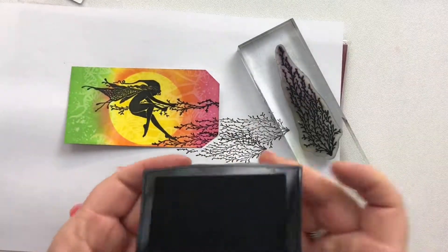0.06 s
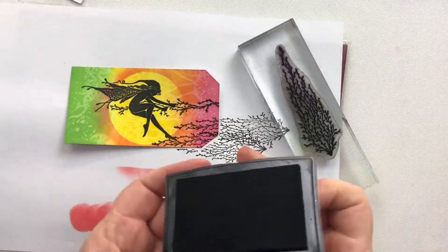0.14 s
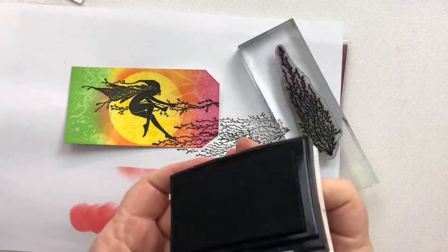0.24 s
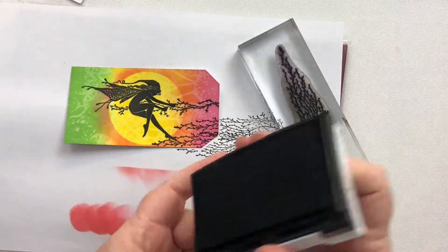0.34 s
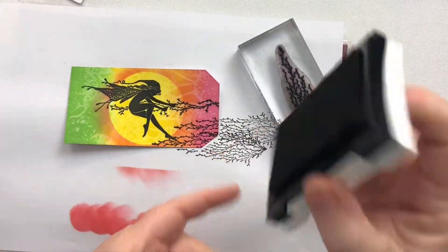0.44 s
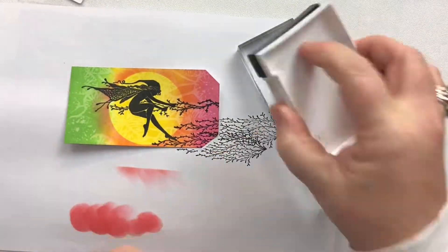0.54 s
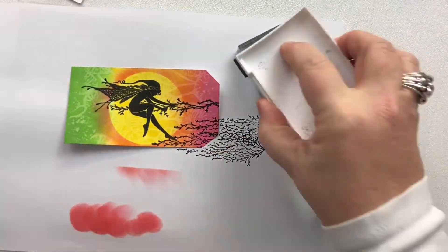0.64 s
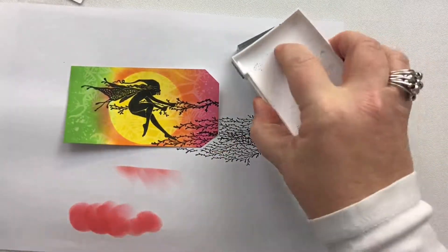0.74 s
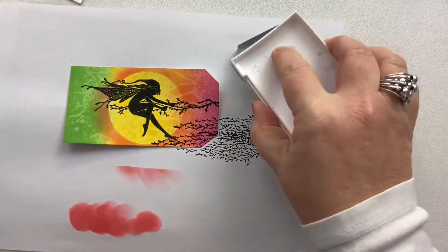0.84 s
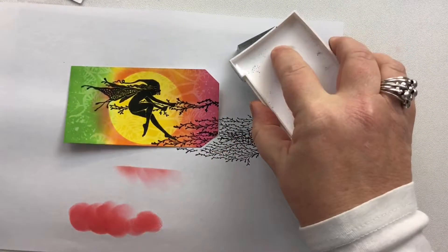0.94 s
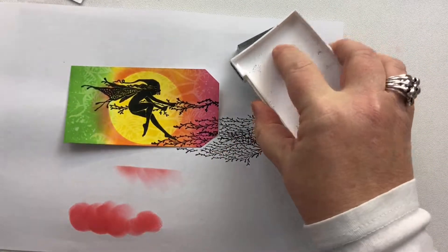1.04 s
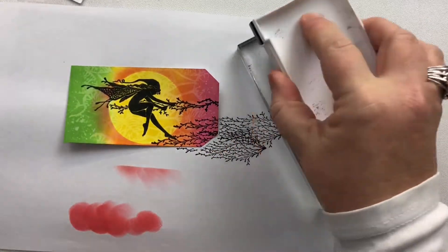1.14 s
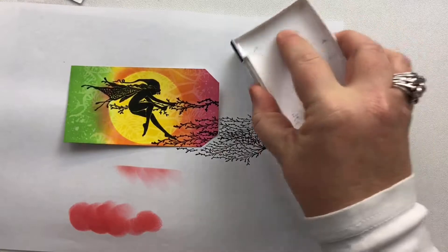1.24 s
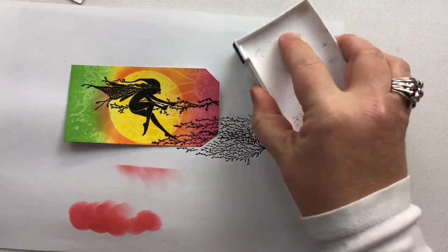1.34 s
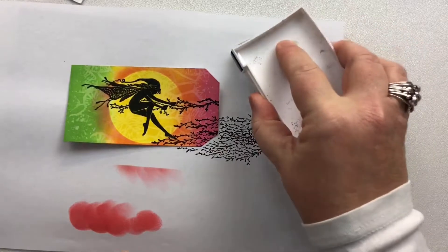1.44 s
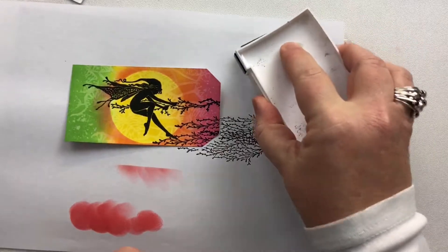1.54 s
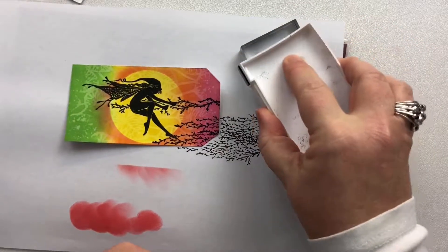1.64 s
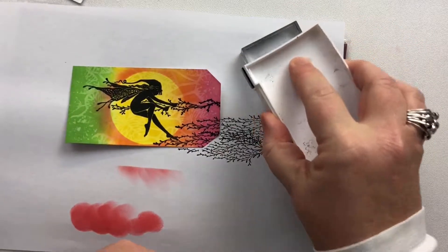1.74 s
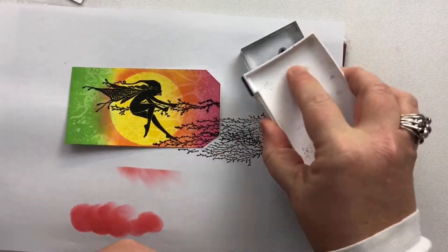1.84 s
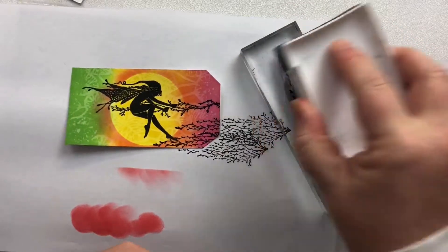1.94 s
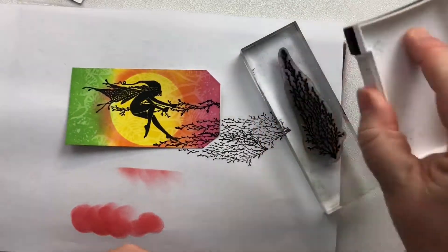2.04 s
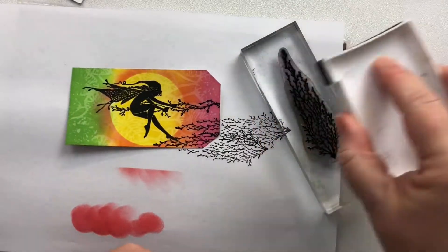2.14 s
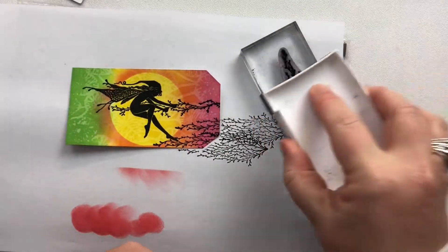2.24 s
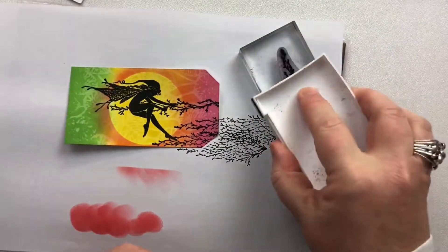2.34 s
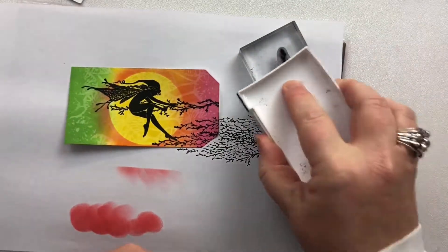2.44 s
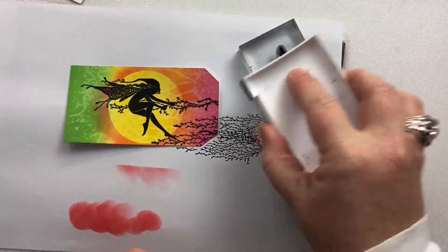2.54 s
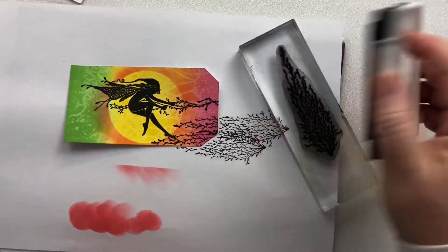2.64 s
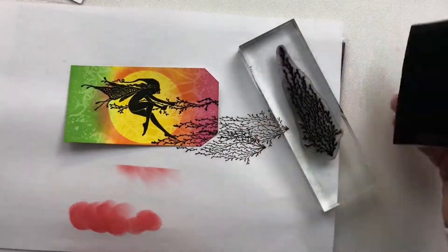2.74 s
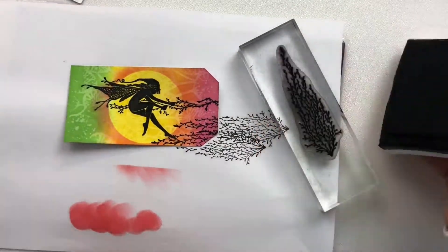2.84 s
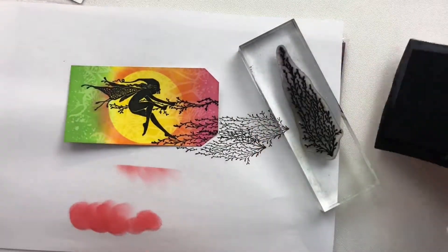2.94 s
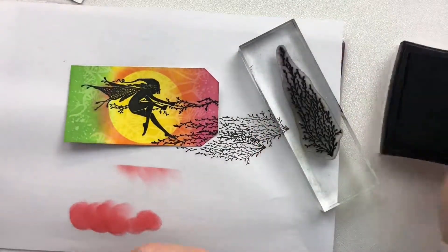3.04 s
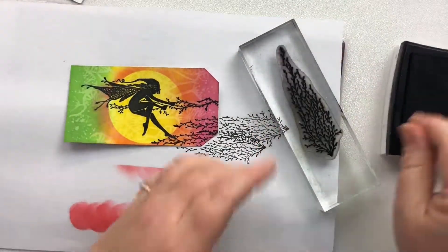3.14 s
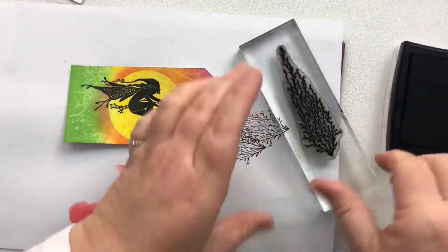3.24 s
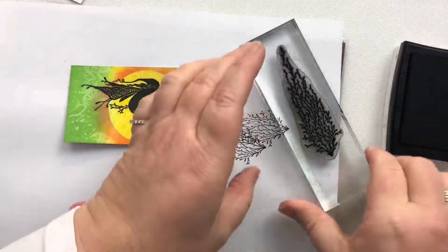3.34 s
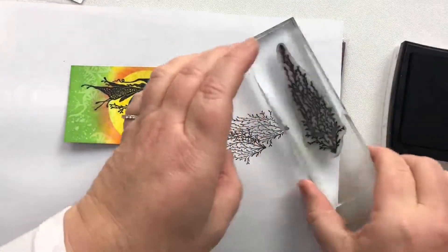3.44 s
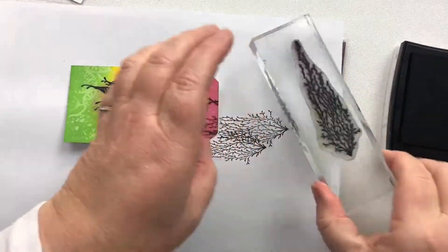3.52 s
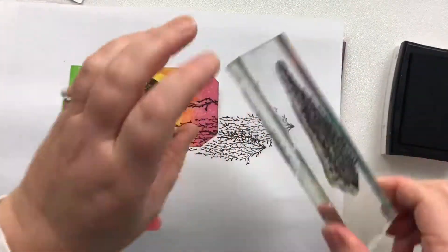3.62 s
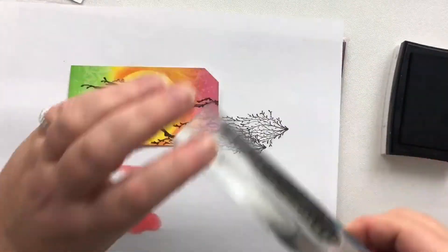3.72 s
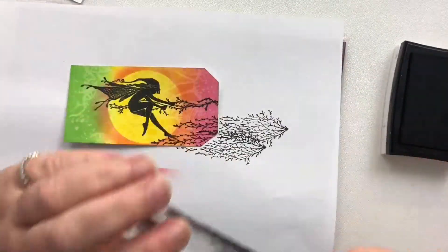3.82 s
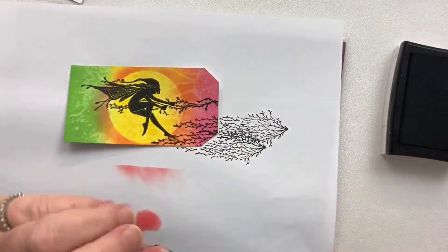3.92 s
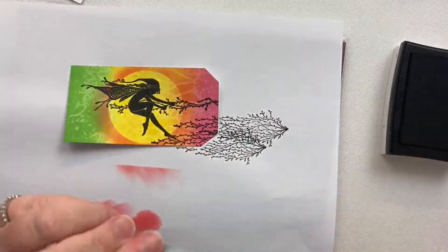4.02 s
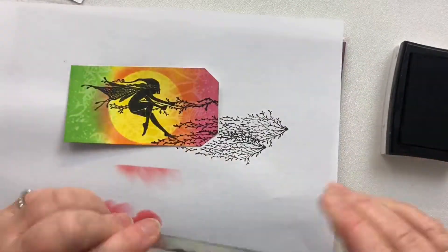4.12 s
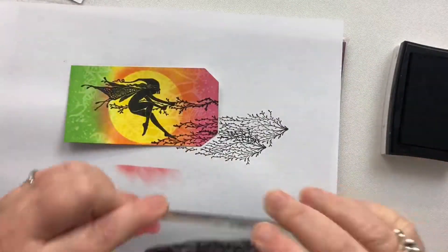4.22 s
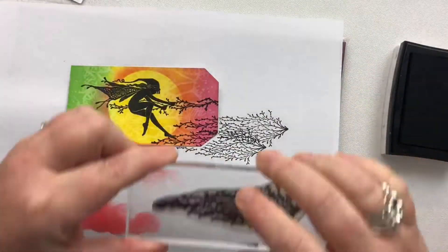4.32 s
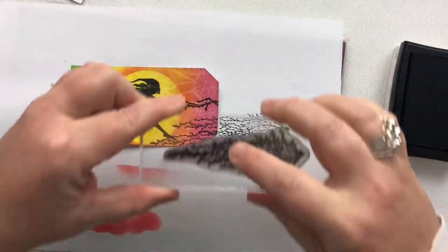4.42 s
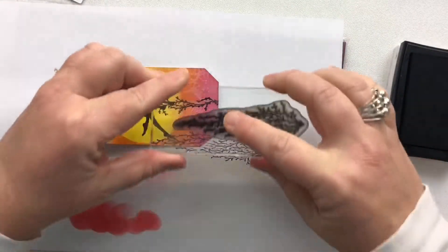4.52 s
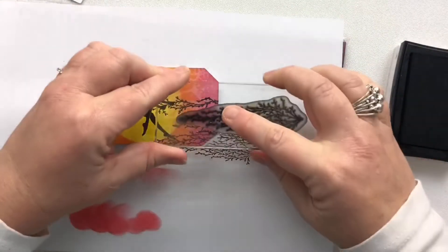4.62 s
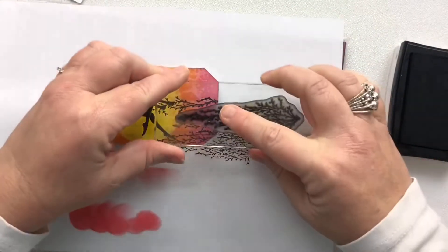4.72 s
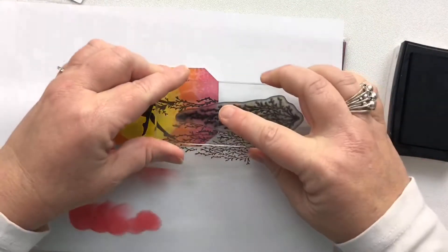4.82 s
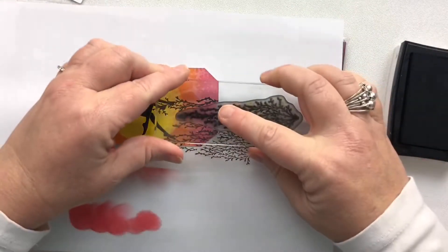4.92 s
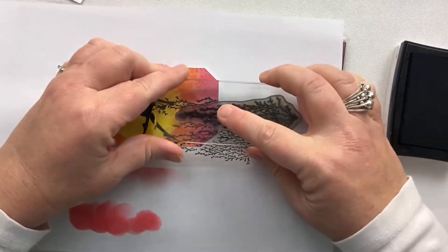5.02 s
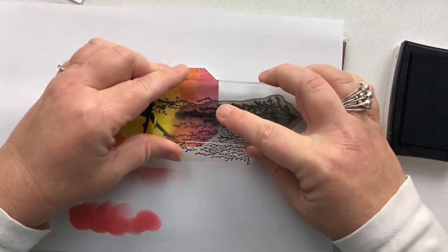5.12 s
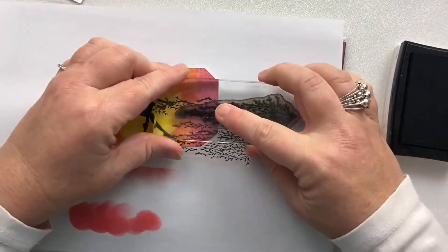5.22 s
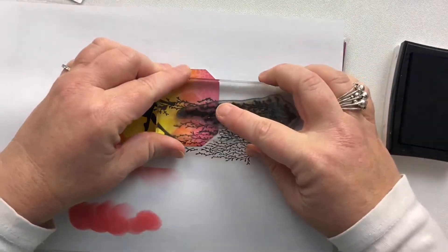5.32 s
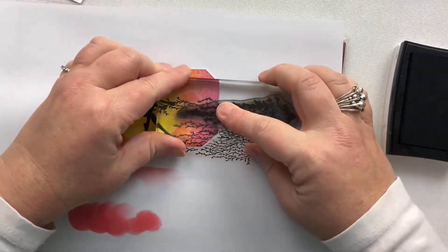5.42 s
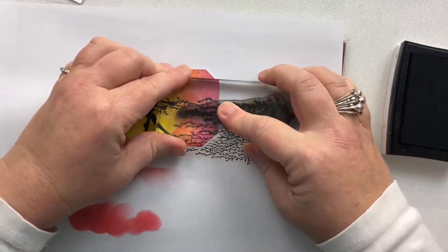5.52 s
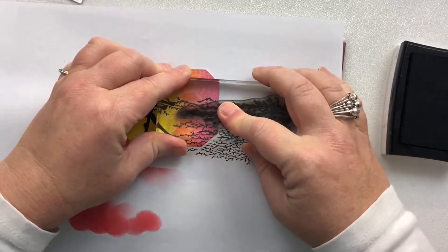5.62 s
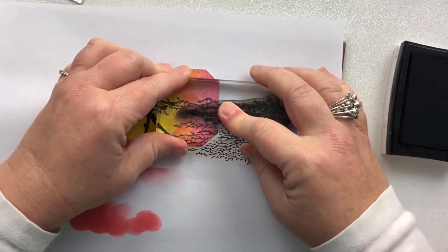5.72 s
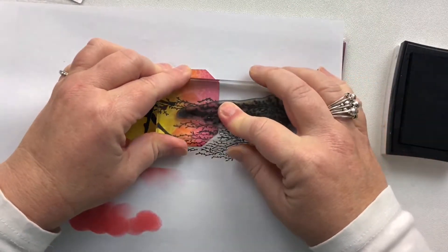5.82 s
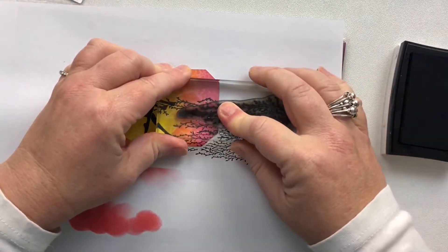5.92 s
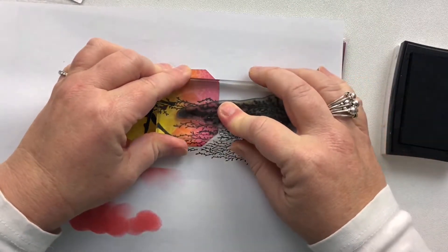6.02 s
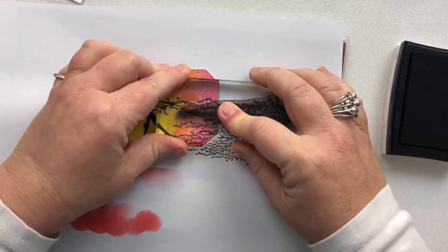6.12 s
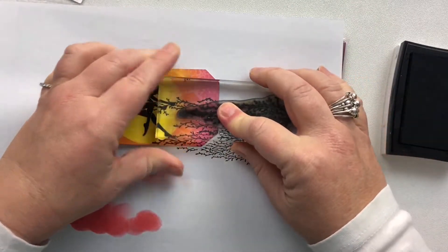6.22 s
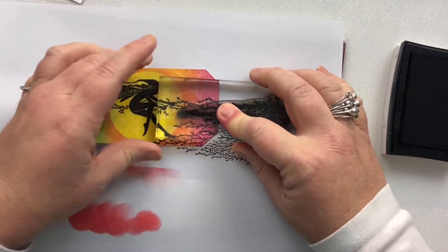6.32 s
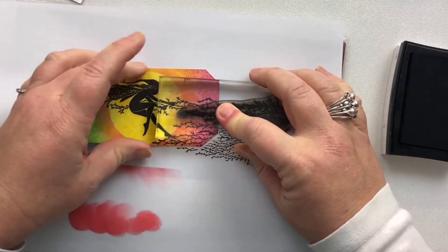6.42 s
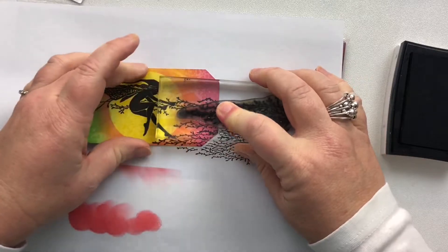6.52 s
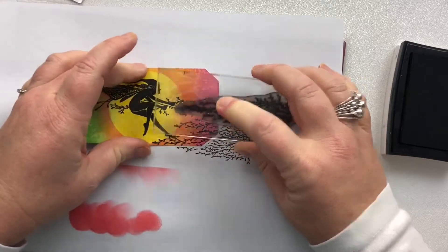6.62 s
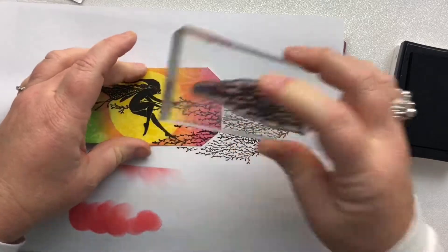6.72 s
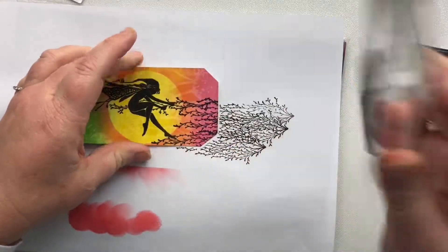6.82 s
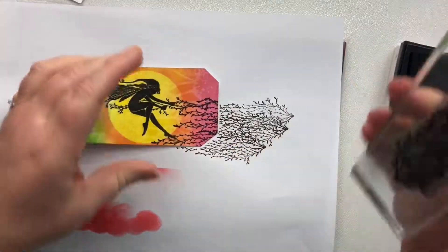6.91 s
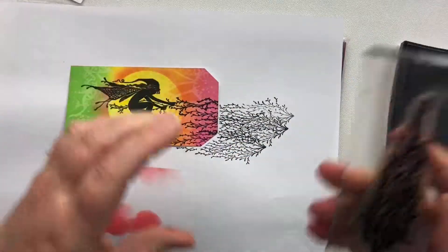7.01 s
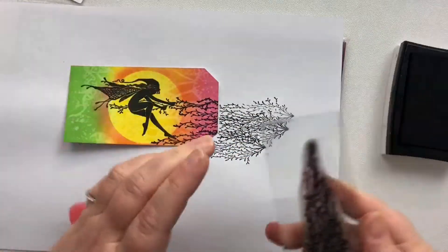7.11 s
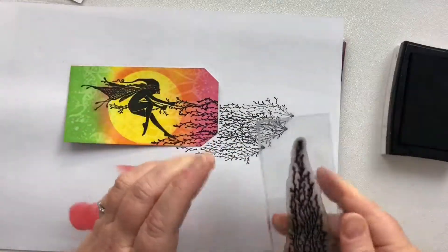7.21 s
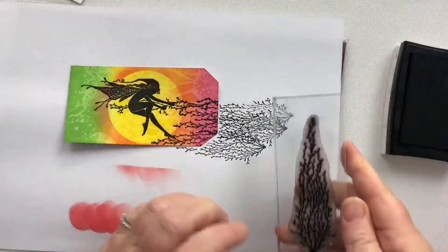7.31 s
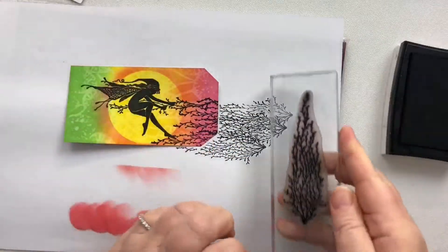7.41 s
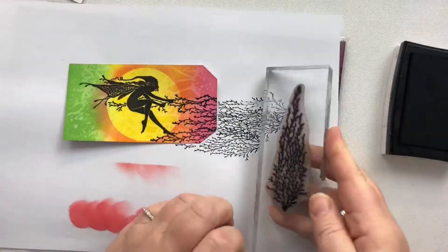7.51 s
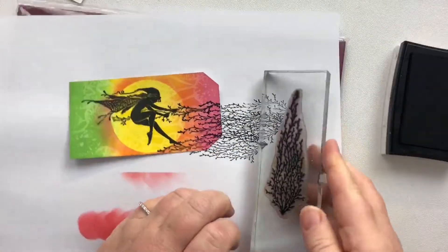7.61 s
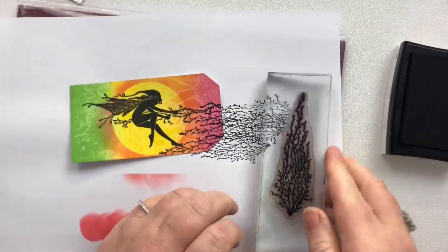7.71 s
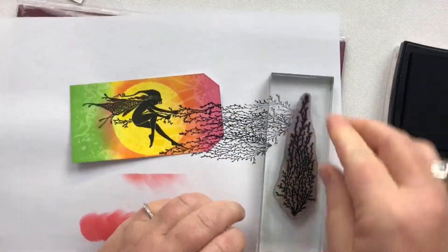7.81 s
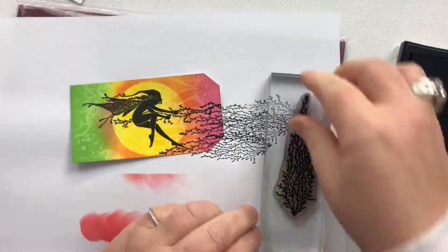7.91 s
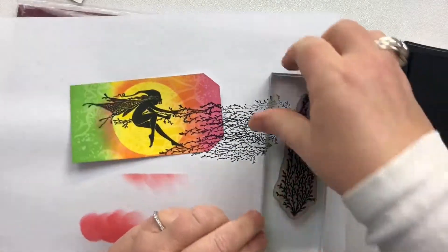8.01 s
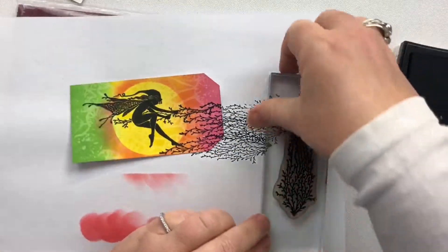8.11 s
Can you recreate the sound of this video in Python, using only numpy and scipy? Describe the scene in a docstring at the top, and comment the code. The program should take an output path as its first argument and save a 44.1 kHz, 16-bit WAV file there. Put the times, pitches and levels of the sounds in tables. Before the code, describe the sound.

Soft ink pad dabs knock on a block, a plastic case drops and clatters on a wooden desk, then quiet rustling and faint sticky ticks.

```python
"""Ink pad and stamp on a desk

An ink pad is dabbed on a stamp block lying on a wooden desk, then dropped aside, where its plastic case
bounces; the block is lifted, pressed on paper, peeled off and set down. Blows drive resonant bodies with
chatter and dying noise; fingers tick through sharp resonances, sleeves rustle as band-limited noise. A small
quiet room adds mains hum and echoes; the microphone stands on the desk and feels its low modes thump."""
import sys
import numpy as np
from scipy import signal
from scipy.fft import rfft, irfft
from scipy.io import wavfile

SR = 44100
rng = np.random.default_rng(int(sys.argv[2]) if len(sys.argv) > 2 else 0)


def wrap_up_sound(samples):
    """Save the sound to the file named by the first command line argument, as 16-bit audio."""
    columns = np.atleast_2d(samples).T
    # keep every value between -1 and 1, then stretch to whole-number steps
    tamed = np.clip(columns, -1, 1)
    steps = np.round(tamed * 32767).astype(np.int16)
    wavfile.write(sys.argv[1], SR, steps)


N = 359856   # samples

# Soft blows through the pad or the block into the desk. Each row: start in seconds, knock, middle and crack
# levels in dB, ringing share in dB, struck spot in Hz, desk shake in dB. Body levels are added to the first three.
DAB_BLOWS = [(0.3659, -54.5, -77, -49, -10, 545, -70), (0.6717, -33.5, -50, -42, -7.5, 580, -40),
             (0.7087, -36.5, -25.5, -13.5, -8, 1860, -30), (0.7792, -50, -66, -45, -7, 1540, -53),
             (1.3305, -39.5, -42.5, -27, -2.5, 590, -29.5), (1.3333, -42, -53, -31.5, -12, 6600, -60),
             (1.4987, -27, -36, -34.5, -6, 627, -21), (1.6832, -30, -32, -26.5, -13.5, 590, -23),
             (1.8574, -29.5, -27.5, -32.5, -4, 637, -23.5), (2.3368, -32.5, -39, -29.5, -9.5, 520, -31.5),
             (2.5145, -56, -40.5, -43.5, -3.5, 493, -28.5), (3.3512, -55, -58, -44, -14, 703, -44.5),
             (5.3404, -60.5, -65, -57.5, 1, 564, -44.5), (6.244, -62.5, -75.5, -60, -8, 503, -47),
             (6.4551, -77, -80, -53, -5.5, 521, -47)]
# The pad's case lands, bounces and rocks to rest. Each row: the same columns and units as the dabs.
CASE_BOUNCES = [(2.7573, -54, -45.5, -49, -5, 433.6, -92), (2.8233, -54.5, -44, -58, -1, 1850, -74.5),
                (2.871, -16.5, -15.5, -12, -1, 700, -42), (2.9117, -18, -15.5, -16.5, -2.5, 535, -39),
                (2.9604, -37, -25, -26, -0.5, 1700, -49.5), (3.0165, -45, -38, -39.5, -2, 1700, -68),
                (3.0932, -18, -13.5, -21, 0, 1050, -39), (3.0978, -19, -10.5, -8, -2.5, 4162, -44.5),
                (3.1456, -20, -25, -28, -8, 453, -42.5), (3.1757, -32, -30, -30.5, -5, 470, -56),
                (3.1932, -33.5, -40, -36, -10, 455, -50), (3.2115, -45, -45, -46, -22, 12600, -67),
                (3.2294, -45, -55, -36, -22, 12300, -79), (3.2334, -55, -27.5, -47, -22, 1740, -81)]
# The block is set down on the paper. Each row: the same columns and units as the dabs.
BLOCK_SET_DOWNS = [(7.4808, -54, -47, -42.5, -2.5, 910, -37.5),
                   (7.6234, -41.5, -42, -39, -6.5, 2170, -30.5),
                   (7.7773, -44.5, -40.5, -32.5, -7, 2370, -29)]
# Resonances of the stamp block, each a crowd of close modes. Each row: centre in Hz, width in Hz, level in dB,
# t60 in seconds before the contact's ring share.
BLOCK_RESONANCES = [(426.2, 250, 7, 0.0255), (670.5, 120, 9, 0.036), (912, 120, -0.5, 0.064),
                    (1322, 180, -1.5, 0.17), (1612, 220, 3.5, 0.099), (1900, 400, 1.5, 0.022),
                    (2130, 240, 0, 0.014), (3650, 2250, -5.5, 0.15), (4370, 1140, -3.5, 0.11),
                    (6550, 1600, -0.5, 0.087), (8400, 2000, -1, 0.04), (11600, 4500, 4, 0.076)]


def from_db(db):
    """Decibels are twenty times the logarithm of an amplitude ratio."""
    return 10 ** (np.asarray(db) / 20)


def rms_one(x):
    """Normalization to unit effective value."""
    return x / np.sqrt(np.mean(x ** 2) + 1e-20)


def at_hz(points, hz):
    """Interpolation along logarithmic frequency."""
    points = np.array(points)
    return np.interp(np.log(np.maximum(hz, 1)), np.log(points[:, 0]), points[:, 1])


def band(x, low_hz, high_hz):
    """Band-pass filtering keeps one range of a spectrum."""
    edges_hz = [low_hz, min(high_hz, .45 * SR)]
    return signal.sosfilt(signal.butter(2, edges_hz, "band", fs=SR, output="sos"), x)


def drift(rate_hz):
    """Low-passed noise makes a slow random fluctuation of rms 1."""
    hz = np.fft.rfftfreq(N, 1 / SR)
    spectrum = rfft(rng.standard_normal(N)) / (1 + (hz / rate_hz) ** 2)
    return rms_one(irfft(spectrum, N))


def decay(t60, size):
    """Exponential damping: the level falls 60 dB in t60 seconds."""
    return from_db(-60 * np.arange(size) / SR / max(t60, .001))


def resonance(x, hz, width_hz):
    """A damped resonator: two poles set pitch and bandwidth, with gain 1 at the peak."""
    r = np.exp(-np.pi * width_hz / SR)   # pole radius
    zeros = [(1 - r * r) / 2, 0, (r * r - 1) / 2]
    poles = [1, -2 * r * np.cos(2 * np.pi * hz / SR), r * r]
    return signal.lfilter(zeros, poles, x)


def add(out, s, sound):
    """Superposition: a sound starting at s seconds is summed into the mix."""
    at = round(s * SR)
    out[at:at + len(sound)] += sound[:N - at]


def hum():
    """Mains hum is a sum of sine lines, each wavering a little in level and phase."""
    # Each row: frequency in Hz, mean level in dB rms.
    lines = [(49.8, -57), (199.2, -84), (249, -82.5), (299, -73.5), (346, -80), (398.5, -86), (498.5, -81),
             (598, -87)]
    t = np.arange(N) / SR
    out = np.zeros(N)
    for hz, db in lines:
        amplitude = np.sqrt(2) * from_db(db + 1.1 * drift(2.5))
        out += amplitude * np.sin(2 * np.pi * hz * t + 0.2 * drift(1.5))
    return out


def room_tone():
    """Stationary room noise is white noise shaped by a spectral density."""
    # Each row: frequency in Hz, relative density in dB per Hz.
    density = [(20, -6), (38, -8.5), (62, -12.5), (85, -15), (100, -20.5), (230, -20.5), (330, -24),
               (600, -27.5), (1600, -40.5), (3500, -41.5), (6700, -40.5), (9000, -45.5), (13000, -45),
               (16000, -56.5)]
    hz = np.fft.rfftfreq(N, 1 / SR)
    shaped = irfft(rfft(rng.standard_normal(N)) * from_db(at_hz(density, hz)), N)
    return from_db(-63.5) * rms_one(shaped)


def desk_sway():
    """Forced motion below 12 Hz: the desk sways under the arms, as narrow noise of varying level."""
    # Each row: time in seconds, level in dB.
    course = [(0.0, -39.5), (0.75, -50), (1.77, -40.5), (2.57, -49), (2.79, -34), (3.09, -53),
              (3.29, -31.5), (3.41, -53.5), (3.68, -41), (4.7, -54), (7.34, -44), (8.16, -53)]
    s, db = np.transpose(course)
    motion = band(band(rng.standard_normal(N), 0.96, 12), 0.96, 12)
    return from_db(np.interp(np.arange(N) / SR, s, db)) * rms_one(motion)


def swells(rows, column, rest_db):
    """Powers of incoherent strokes add over a resting level; each rises to its peak, fades and stops."""
    fade_db = 8.5   # a stroke is twice this below its peak at one rise or fall time away
    t = np.arange(N) / SR
    power = from_db(rest_db) ** 2
    for row in rows:
        s, rise, fall = row[:3]
        away = np.where(t < s, (s - t) / rise, (t - s) / fall)
        level_db = row[column] - fade_db * (away + np.minimum(away, 2) ** 6)
        power = power + from_db(level_db) ** 2
    return np.sqrt(power)


def rubbing():
    """Friction makes grainy noise in three separately patchy ranges, and excites the hollow case."""
    # Strokes of skin, cloth and paper. Each row: strongest moment, rise and fall in seconds, then middle,
    # treble and top levels in dB, before the patchiness.
    strokes = [(0.06, 0.1, 0.24, -67.5, -67.5, -75), (0.165, 0.015, 0.021, -60, -53, -58),
               (0.46, 0.12, 0.33, -69.5, -69.5, -79), (0.73, 0.085, 0.063, -63, -69, -78),
               (0.89, 0.12, 0.07, -81, -71.5, -85), (1.72, 0.15, 0.25, -84, -80, -88),
               (2.83, 0.022, 0.045, -54, -55, -64), (2.86, 0.084, 0.032, -67, -65, -70),
               (3.32, 0.078, 0.094, -60, -58.5, -80), (3.44, 0.048, 0.046, -65.5, -57.5, -63),
               (3.54, 0.056, 0.085, -68, -63.5, -71), (3.8, 0.25, 0.28, -70.5, -72.5, -78),
               (4.24, 0.037, 0.095, -82.5, -73.5, -69.5), (4.33, 0.08, 0.09, -69, -71, -74.5),
               (4.5, 0.09, 0.068, -67, -72, -77), (4.86, 0.044, 0.038, -75, -77, -89),
               (5.32, 0.02, 0.087, -71, -76.5, -85.5), (5.45, 0.04, 0.17, -70, -70, -79),
               (5.6, 0.14, 0.12, -68.5, -73.5, -77), (6.63, 0.11, 0.11, -69.5, -68.5, -77),
               (6.84, 0.025, 0.025, -73.5, -64, -69), (7.1, 0.3, 0.27, -72, -73, -76.5),
               (7.62, 0.046, 0.11, -74, -55.5, -66), (7.755, 0.058, 0.028, -63, -56.5, -66)]
    # Fingers shift on the hollow pad case. Each row: strongest moment, rise and fall in seconds, level in dB.
    handling = [(0.06, 0.076, 0.23, -64.5), (0.72, 0.11, 0.075, -63.5), (0.9, 0.08, 0.085, -67.5),
                (2.86, 0.19, 0.02, -64.5), (3.24, 0.02, 0.069, -68)]
    # Faint rustle between strokes: middle, treble, top and hollow levels in dB.
    rest_db = (-80.5, -81.5, -84, -88)
    patchy_db, patch_hz = 1.26, 35
    grains = from_db(3.4 * rng.standard_normal(N))
    gains = []
    for k in range(3):
        patches = from_db(patchy_db * drift(patch_hz))
        gains.append(swells(strokes, 3 + k, rest_db[k]) * patches)
    middle, treble, top = gains
    out = middle * rms_one(band(grains * rng.standard_normal(N), 350, 3400))
    hiss = grains * rng.standard_normal(N)
    out += treble * rms_one(band(hiss, 3100, 7600) + from_db(2.5) * band(hiss, 5800, 7000))
    out += top * rms_one(band(grains * rng.standard_normal(N), 10000, 14500))
    hollow = swells(handling, 3, rest_db[3])
    # handling makes the case hum
    return out + hollow * rms_one(resonance(grains * rng.standard_normal(N), 1700, 220))


def chatter(t60, spread_db, size):
    """Uneven micro-contacts form one blow: a dying run of clicks of very unlike size."""
    clicks = from_db(spread_db * rng.standard_normal(size)) * rng.choice([-1, 1], size)
    clicks[0] = from_db(12.0)   # a strong first touch
    return clicks * decay(t60, size)


def blows(events, kind, body, level_db):
    """Impact excitation: chatter sounds through a body's resonances, whose crowded modes ring as dying noise."""
    # Where the knock, middle, crack and top levels apply, in Hz.
    band_hz = (600, 1600, 5200, 12000)
    chatter_follows = 0.24   # share of the ringing dB by which a damped contact is also shorter
    # width over pitch; shares of the damping dB by which the spot widens and stands out
    spot_width, spot_widens, spot_gains = 0.073, 0.23, .3
    size = 12288
    out = np.zeros(N)
    top_db, t60, spot_db, ring_share = kind
    for s, low_db, mid_db, high_db, ring_db, spot_hz, *_ in events:
        hardness = list(zip(band_hz, (low_db, mid_db, high_db, high_db + top_db)))
        contact = chatter(t60 * from_db(chatter_follows * ring_db), 4.4, size)
        ringing = from_db(ring_db) * rng.standard_normal(size)
        # a spot above the crack's frequency is as strong as the crack
        lift_db = at_hz(hardness, min(spot_hz, band_hz[2])) - at_hz(hardness, spot_hz)
        spot_width_hz = spot_width * spot_hz * from_db(-spot_widens * ring_db)
        spot = (spot_hz, spot_width_hz, spot_db + lift_db - spot_gains * ring_db, .07)
        chance_db = 1.5 * rng.standard_normal(len(body) + 1)
        # the struck spot lends its own pitch
        for k, (hz, width_hz, db, ring_t60) in enumerate(body + [spot]):
            gain_db = db + at_hz(hardness, hz) + level_db + chance_db[k]
            gain = from_db(gain_db) * np.sqrt(SR / width_hz)   # offsets the power lost in a narrow band
            force = contact + ringing * decay(ring_share * ring_t60, size)
            add(out, s, (-1) ** k * gain * resonance(force, hz, width_hz))
    return out


def finger_ticks():
    """Light contacts excite the resonances of small edges: nails, plastic and sticky ink tick."""
    # Each row: start in seconds, knock, middle and crack levels in dB before the body level,
    # ringing share in dB, struck spot in Hz.
    tick_events = [(0.153, -55.5, -52, -42, 4.5, 5700), (0.399, -59, -48.5, -44, -6, 2120),
                   (0.6285, -46.5, -51, -50, -8, 1570), (0.652, -47.5, -36, -42, -9, 2270),
                   (0.8584, -63, -44, -42.5, -7, 930), (0.8654, -37.5, -42, -54, -16, 1560),
                   (0.8714, -61, -45, -47, -2, 1860), (0.9404, -54, -63, -60, -1.5, 861),
                   (1.0444, -53.5, -57, -79, -4, 1440), (2.6743, -62, -76, -53, 0.5, 825),
                   (2.7215, -57.5, -59, -59, -2.5, 1310), (3.4017, -61, -52.5, -48, -15, 6900),
                   (3.531, -64.5, -49, -33.5, -3, 7200), (3.7151, -45.5, -36, -24, -31, 3330),
                   (4.0474, -72, -56.5, -61.5, -9.5, 1350), (4.1084, -74, -76.5, -56, -9, 884),
                   (4.2132, -78, -76, -58, -7.5, 12700), (4.56, -76, -75, -49.5, -10, 6470),
                   (4.7511, -52, -50, -58, -9, 923), (4.9234, -68.5, -69, -59, -19, 1490),
                   (5.3178, -54, -67, -55.5, -12.5, 1297), (5.5434, -62, -51.5, -54, -12, 12000),
                   (5.6394, -73, -75, -66, -5, 12800), (5.9827, -75.5, -78, -64, -18.5, 12500),
                   (6.2482, -61, -69, -50.5, -16, 931), (6.4612, -62, -78, -46.5, -18, 6830),
                   (6.574, -63, -71, -54, -16, 816), (6.6167, -57.5, -49, -32.5, -2, 6790),
                   (6.6247, -40.5, -47, -35.5, -7, 4300), (6.6436, -56.5, -51.5, -30, -1, 6270),
                   (7.11, -75, -72, -61, -18, 12200), (7.24, -78, -78, -65, -17.5, 11800),
                   (7.4932, -51, -46.5, -39.5, -18, 2400)]
    # Shared by all ticks: top over crack in dB, chatter t60 in seconds before the damping,
    # spot level in dB before the damping, share of the body's ring time.
    contact_kind = (-18.5, .009, -0.5, 1.09)
    # Each row: centre in Hz, width in Hz, level in dB, t60 in seconds before the ring share.
    edge_resonances = [(640, 165, 4, 0.15), (1870, 660, 5, 0.058), (2177, 3300, 2, 0.043),
                       (3460, 450, -3.5, 0.012), (4985, 1100, -7.5, 0.086), (6670, 1100, 7, 0.021),
                       (9700, 5200, 5, 0.034), (12600, 6500, 11, 0.041)]
    return blows(tick_events, contact_kind, edge_resonances, level_db=-10)


def rings(modes):
    """Free vibration: each mode is one exponentially dying sine."""
    size = SR // 2
    t = np.arange(size) / SR
    return np.array([from_db(db) * np.sin(2 * np.pi * hz * t) * decay(t60, size) for hz, db, t60 in modes])


def thumps():
    """Modal response: the desk's low modes swing down, felt through the stand; its higher modes thud in air."""
    # Low and higher desk modes. Each row: frequency in Hz, level in dB, t60 in seconds.
    low_modes = [(51.4, 0.5, 0.21), (95, -11.5, 0.16), (124, -14.5, 0.13)]
    high_modes = [(198.4, -5.5, 0.16), (234, 4, 0.04), (255.8, -10.5, 0.04), (330, -6, 0.052),
                  (391.5, -9, .08)]
    # A hand or wrist bumps the desk. Each row: start in seconds, desk shake in dB.
    bumps = [(0.269, -51.5), (0.858, -45), (3.715, -42), (5.619, -50.5), (5.779, -50), (6.623, -48)]
    lag_s = 0.0085   # the low modes reach the stand late
    swing, thud = -rings(low_modes).sum(axis=0), rings(high_modes)
    # the desk never rests: a shiver 5 Hz wide at its lowest mode
    felt = from_db(-60) * rms_one(resonance(rng.standard_normal(N), low_modes[0][0], 5))
    heard = np.zeros(N)
    # each pair: events, desk thud over desk shake in dB
    for events, thud_db in ((DAB_BLOWS, -3), (BLOCK_SET_DOWNS, -4.5), (CASE_BOUNCES, 17.5), (bumps, -4)):
        for s, *_, shake_db in events:
            add(felt, s + lag_s, from_db(shake_db) * swing)
            mode_db = shake_db + thud_db + 2.0 * rng.standard_normal(len(thud))
            add(heard, s, from_db(mode_db) @ thud)
    # the air carries little bass
    return signal.sosfilt(signal.butter(2, 150, "high", fs=SR, output="sos"), heard), felt


def pad_dabs():
    """Soft impact: the block's resonances answer short, damped blows of the ink pad."""
    # Columns as for the ticks: top over crack in dB, chatter t60 in seconds, spot level in dB, ring share.
    contact_kind = (-18, 0.0019, -2, 0.87)
    return blows(DAB_BLOWS, contact_kind, BLOCK_RESONANCES, level_db=-9)


def case_bounces():
    """Repeated impact: the hollow plastic case rings at each landing."""
    # Columns as for the ticks: top over crack in dB, chatter t60 in seconds, spot level in dB, ring share.
    contact_kind = (-8, .022, 0.5, 0.97)
    # Each row: centre in Hz, width in Hz, level in dB, t60 in seconds before the ring share.
    case_resonances = [(480.3, 66, 1.5, 0.12), (686, 100.2, 5, 0.08), (857.4, 120, 4.5, 0.069),
                       (1050, 120, -2, .13), (1310, 300, -0.5, 0.14), (1791, 540, 1.5, 0.12),
                       (2271, 380, -1.5, .1), (2930, 160, -10, 0.18), (4170, 1100, -3, 0.041),
                       (4920, 360, -5.5, 0.035), (5020, 560, -0.5, 0.11), (6280, 690, 2.5, 0.13),
                       (7600, 1000, 0, 0.089), (9950, 1400, 1.5, 0.086), (12000, 870, 4, 0.11),
                       (14800, 1100, -8.5, 0.065)]
    return blows(CASE_BOUNCES, contact_kind, case_resonances, level_db=-11.0)


def block_set_downs():
    """Damped impact: the block meets the paper with long chatter and shortened ringing."""
    # Columns as for the ticks: top over crack in dB, chatter t60 in seconds, spot level in dB, ring share.
    contact_kind = (-24, 0.11, -9.5, 0.32)
    return blows(BLOCK_SET_DOWNS, contact_kind, BLOCK_RESONANCES, level_db=-11)


def room(x):
    """Diffuse reverberation: convolution with octave bands of noise, each dying at its own rate."""
    # Each row: frequency in Hz, t60 in seconds.
    reverberation = [(100, 0.44), (300, 0.21), (1000, 0.25), (4000, 0.23), (12000, 0.17)]
    size = 20000
    white = rng.standard_normal(size)
    tail = np.zeros(size)
    for hz in 125 * 2 ** np.arange(8):
        octave = band(white, hz / np.sqrt(2), hz * np.sqrt(2))
        tail += octave * decay(at_hz(reverberation, hz), size)
    tail[:round(.003 * SR)] = 0   # the first walls are a step away
    return signal.fftconvolve(x, tail / np.sqrt(np.sum(tail ** 2)))[:N]


def scene():
    """Superposition of the direct sounds, their echoes and the desk motion, as one channel."""
    thuds, felt = thumps()
    knocks = pad_dabs() + block_set_downs() + case_bounces() + thuds
    ticks = finger_ticks()
    echoes = room(from_db(-9) * knocks + from_db(-22) * ticks)
    background = room_tone() + desk_sway()
    return (knocks + ticks + echoes + felt + background + rubbing() + hum())[None]


def record(dry):
    """Saturation rounds the peaks; a steep low-pass, 90 dB down from 16400 Hz, cuts the top."""
    rounded = .75 * np.tanh(dry / .75)
    return signal.sosfilt(signal.cheby2(20, 90, 16400, fs=SR, output="sos"), rounded)


dry = scene()
out = record(dry)
wrap_up_sound(out)
```